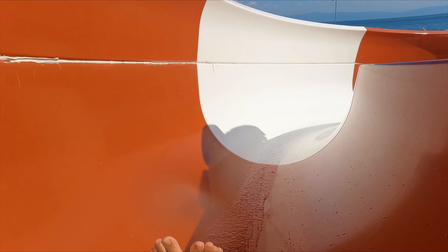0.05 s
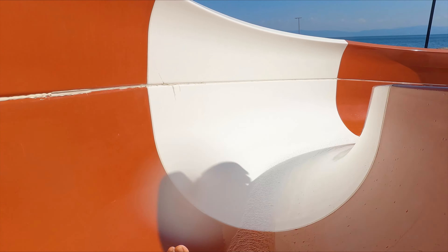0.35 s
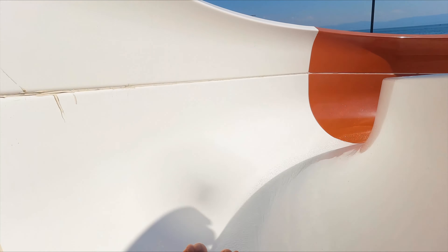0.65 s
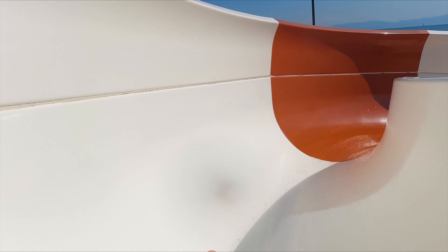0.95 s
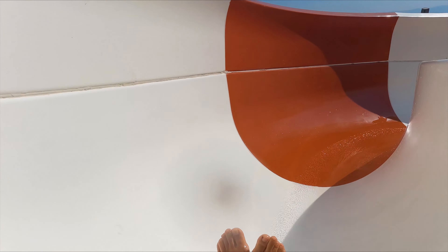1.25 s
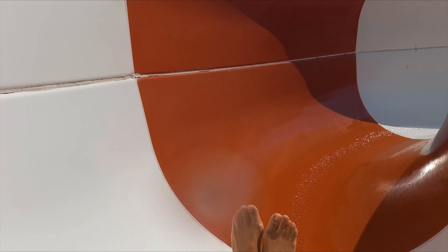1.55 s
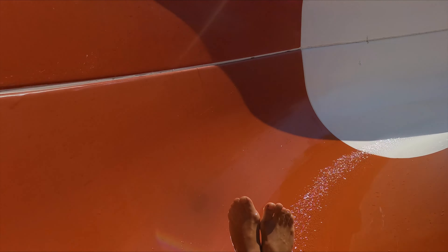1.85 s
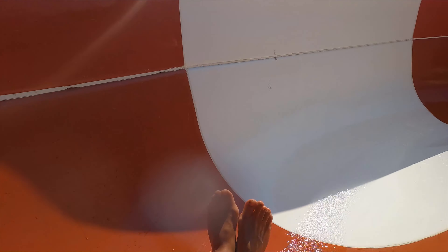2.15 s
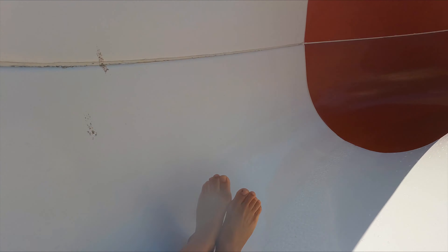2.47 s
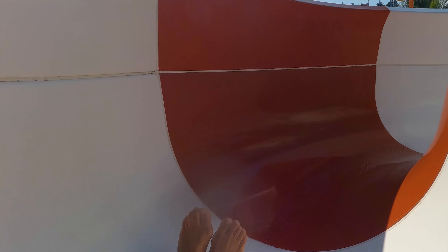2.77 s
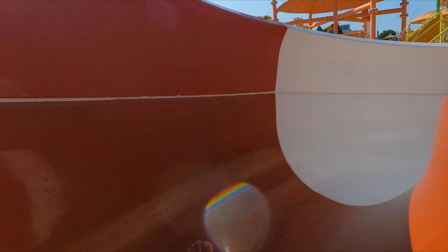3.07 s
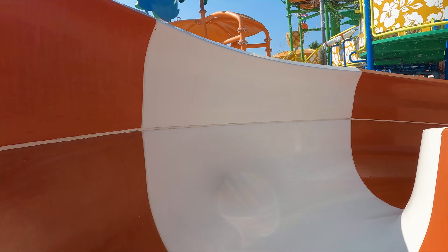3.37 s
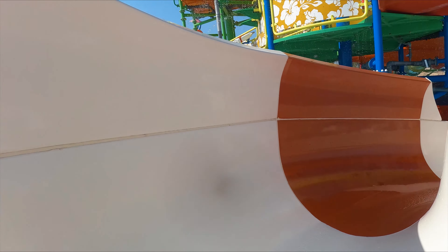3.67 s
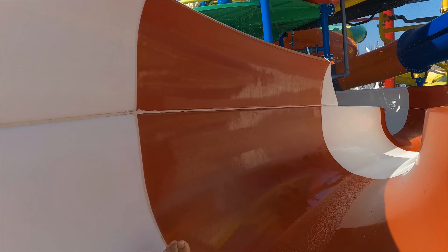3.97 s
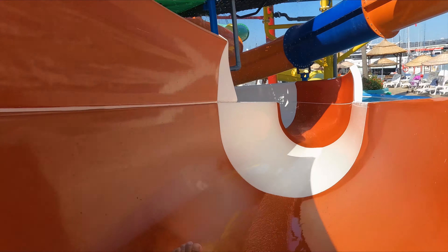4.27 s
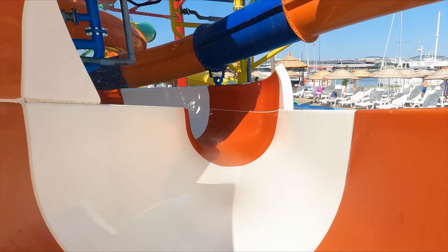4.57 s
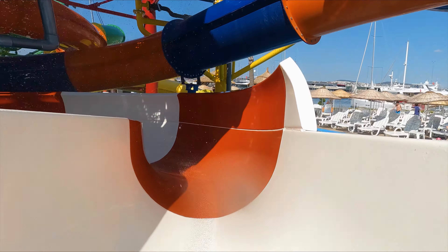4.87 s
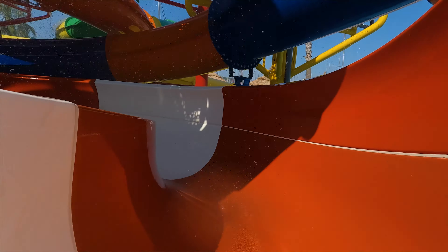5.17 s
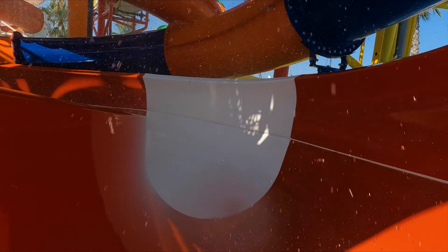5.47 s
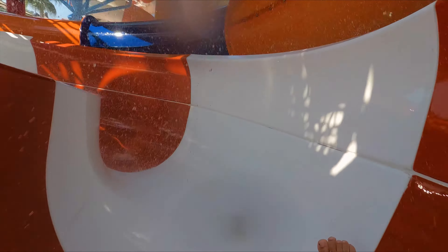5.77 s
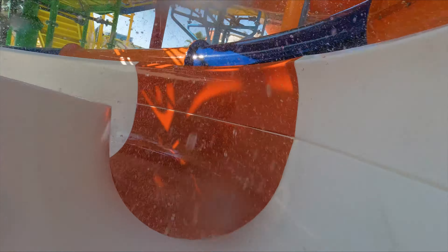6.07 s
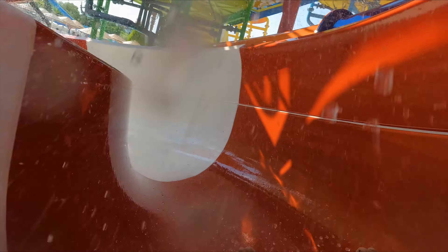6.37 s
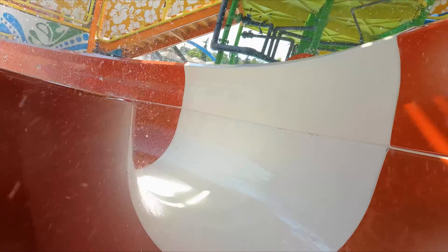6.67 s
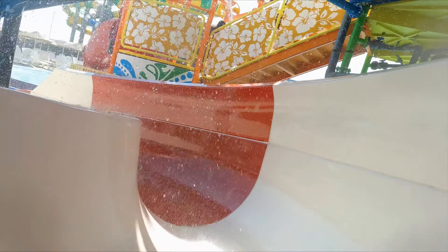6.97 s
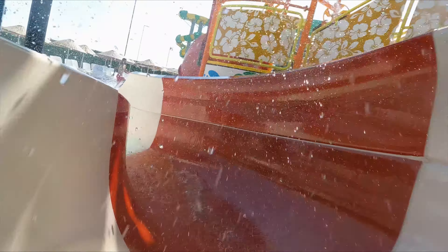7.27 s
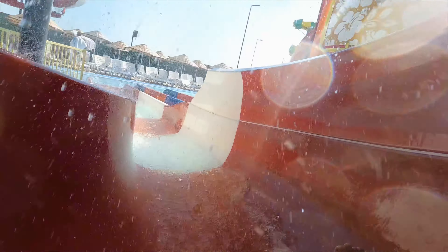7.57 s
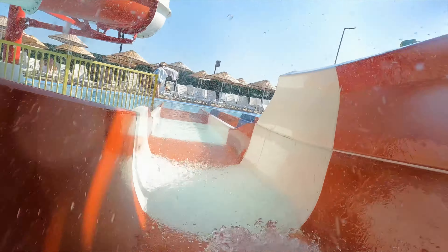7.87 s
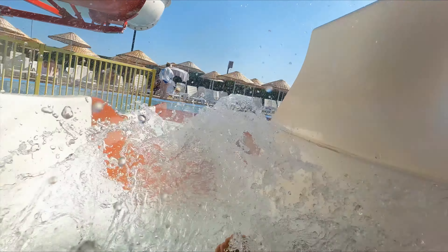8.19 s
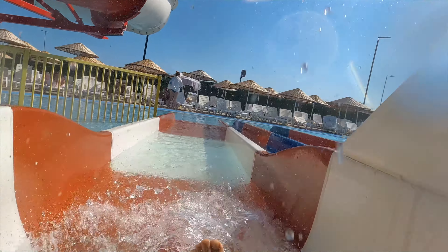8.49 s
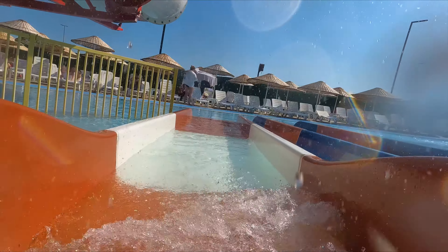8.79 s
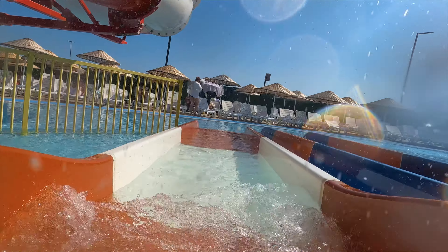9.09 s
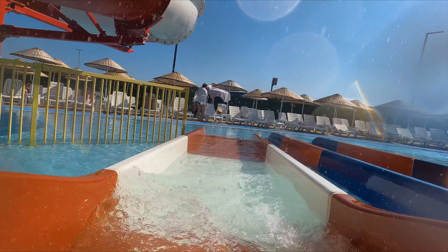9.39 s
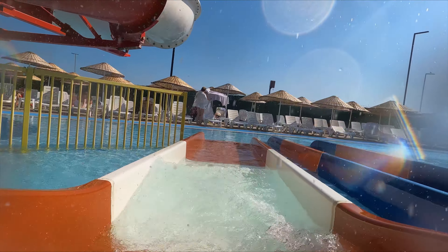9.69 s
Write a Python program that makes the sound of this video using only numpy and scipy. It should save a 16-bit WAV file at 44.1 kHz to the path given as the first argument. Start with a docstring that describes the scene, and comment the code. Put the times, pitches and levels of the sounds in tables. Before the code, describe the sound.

From the start, a film of water hisses steadily, very close to a waterproof camera riding down a fibreglass water slide. Low wind buffeting and the flume's rumble run underneath. During the first two seconds the shell hums briefly several times, and soft, dull thumps follow at about 2.3, 2.8 and 3.7 seconds. From 5.5 to 7 seconds the hiss wavers in pitch and sputters, the wind peaks, and spray and large drops tick on the case. At around 6.5 seconds water floods the microphone, and the hiss sinks and dulls over the next second. Muffled churning takes over, with bubble gulps, scattered taps, a brief faint fizz near 7.3 and a thump near 8. A hollow, muffled water roar swells from about 8.3 to 9 seconds, then eases into low churning and gurgling until the end, just before 10 seconds.

```python
"""Inside a fibreglass water slide, riding down with a waterproof camera in hand.
Right at the microphone, the water film hisses through the resonances of the wet port. Spray ticks on
the case, wind buffets the port, and the flume drums and hums under the rider.
Then water floods the port: the hiss sinks away and the run-out lane churns and gulps, muffled."""
import sys
import numpy as np
from scipy import signal
from scipy.fft import rfft, irfft, next_fast_len
from scipy.io import wavfile
from scipy.ndimage import map_coordinates

SR = 44100
rng = np.random.default_rng(int(sys.argv[2]) if len(sys.argv) > 2 else 0)


def waveform_to_disk(signal):
    """Save audio, clipped to [-1, 1], as 16-bit WAV at the path in sys.argv[1]."""
    frames = np.transpose(np.atleast_2d(signal))
    scaled = np.clip(frames, -1, 1) * 32767
    samples = np.round(scaled).astype(np.int16)
    wavfile.write(sys.argv[1], SR, samples)


N = 429534
TIME = np.arange(N) / SR

# water film just under the rider: (time [s], relative level [dB])
HISS_LEVEL = [(0, -29.5), (.6, -32), (2.6, -29), (4, -30.5), (5.05, -28.5), (5.45, -25.5), (6.19, -27.5),
              (6.3, -34.5)]
# the hiss before it enters the microphone port: (frequency [Hz], relative density [dB])
FILM_SPECTRUM = [(200, -12), (450, -19.5), (650, -1.5), (1200, -3.5), (1900, -2), (4000, -8), (5000, -24),
                 (6500, -33.5), (8000, -40), (10000, -54.5), (13000, -83)]
# peaks and notches of the wet port: (frequency [Hz], width [Hz], gain [dB], share of a surge [ratio])
PORT_RESONANCES = [(1903, 273, 10, 0.21), (2174, 288, -12, 0.7), (2497, 295, 10.5, 1),
                   (2896, 110, -12.5, 0.71), (3437, 236, -21.5, 0.73), (3936, 274, 8.5, 1.0),
                   (5600, 280, 4.5, 1.0), (6470, 400, 6.5, .6), (7180, 430, -6.5, 0.62),
                   (7450, 540, 5.5, 0.98), (9800, 700, 4, .8)]
# surges of water shift those resonances: (crest time [s], rise in pitch [fraction], half-width [s])
PORT_SURGES = [(.27, 0.011, .055), (.5, -0.031, 0.12), (4.35, 0.035, 0.08), (4.62, -0.027, 0.046),
               (4.77, 0.055, 0.026), (5.655, .048, 0.03), (5.771, 0.071, 0.022), (5.856, 0.13, 0.024),
               (5.932, .15, 0.026), (6.12, -0.052, .075), (6.238, -0.011, .016), (6.333, 0.26, .023),
               (6.411, .22, 0.028), (6.487, 0.15, .027), (6.567, .125, 0.015), (6.627, .15, .03),
               (6.895, .11, 0.026), (7.16, 0.013, .025)]
# drops landing right on the port: (time [s], level against the hiss [dB])
PORT_CRACKLE = [(5, -19), (5.8, -7.5), (6.5, -5)]

# deep water around the case: (time [s], churn level before the water's depth scales it [dB])
CHURN_LEVEL = [(6.3, -6.5), (6.91, -28), (7.25, -22.5), (8.74, -20.5), (9.27, -22), (9.7, -20.5)]
# foam comes up as the port floods: (time [s], foam level [dB], churn pitch [ratio])
FLOODING = [(5.2, -85, 0.9), (6.35, -54, 1.33), (6.85, -56, 0.82), (7.25, -52.5, 0.89), (7.7, -49.5, 0.9),
            (8, -48, 1.106), (8.65, -43, 1.03), (9.1, -47, 1.043), (9.74, -47, 1.067)]
# churn and foam in the run-out lane: (frequency [Hz], relative density [dB])
CHURN_SPECTRUM = [(150, -23), (280, -2), (420, -2.5), (600, -4), (850, -9.5), (1100, -17.5), (1450, -29.5),
                  (2200, -51.5), (4000, -76)]
FOAM_SPECTRUM = [(600, -7), (1400, 2.5), (2000, -2.5), (2800, -9.5), (4000, -20.5), (5500, -27),
                 (7500, -38), (10000, -64)]
# the body ploughs a hollow into the lane: (time [s], level [dB])
HOLLOW_LEVEL = [(7.8, -59), (8.2, -35), (8.45, -23.5), (8.8, -23.5), (8.95, -28.5), (9.3, -34.5),
                (9.74, -36)]
# the hollow's resonances: (frequency [Hz], width [Hz], relative level [dB])
HOLLOW_MODES = [(450, 79, 1), (573, 310, -5.5)]
# single big bubbles: (time [s], peak [dB], pitch [Hz], glide [octaves/s], t60 [s])
BIG_BUBBLES = [(1.194, -19.5, 1850, -2, 0.06), (6.562, -16, 735, -27.5, 0.064),
               (7.0, -14.5, 450, -7.5, 0.059), (7.235, -23, 782, -1, 0.19), (7.475, -13.5, 450, -1, 0.08),
               (7.659, -7, 206, -26, 0.036), (8.895, -21, 745, -1, 0.76), (9.167, -28, 1440, -2, 0.38),
               (9.401, -14, 403, -5, 0.14)]

# large drops on the case, lower and deader once the port is full:
# (time [s], ring peak [dB], ring pitch [Hz], ring t60 [s], crack peak [dB], crack pitch [Hz])
LARGE_DROPS = [(5.652, -11.5, 1960, 0.017, -18, 4000), (5.971, -11, 1950, 0.005, -9, 4050),
               (6.081, -13.5, 1850, 0.028, -40, 4000), (6.162, -12, 1750, 0.011, -36, 6800),
               (6.214, -9.5, 1890, 0.03, -31, 4100), (6.307, -12.5, 2080, 0.013, -16.5, 4830),
               (6.322, -16, 2000, 0.02, -38, 4200), (6.369, -17, 2030, .012, -18, 5200),
               (6.43, -25, 1990, .012, -20, 3100), (6.498, -13, 1957, 0.03, -36, 4300),
               (6.571, -20, 1830, .015, -32, 2900), (6.581, -19, 1040, 0.0088, -30, 4100),
               (6.673, -24, 1970, 0.021, -31, 4200), (6.7252, -19.5, 1910, 0.012, -33, 4370),
               (7.3473, -25.5, 1480, .008, -34, 2800), (7.3735, -21.5, 1260, 0.0077, -36, 2805),
               (7.425, -18, 1780, .005, -22, 3000), (7.435, -21, 1400, 0.015, -52, 2800),
               (7.478, -28, 1250, .008, -31, 2700), (7.498, -20, 1150, 0.0054, -36, 3300),
               (7.67, -18.5, 1210, 0.04, -46, 2600), (7.756, -19.5, 1199, 0.0047, -35, 3080),
               (7.884, -20, 1120, 0.01, -49, 2800), (7.9252, -24, 1350, 0.0068, -32, 3600),
               (7.977, -18, 1090, 0.011, -32, 2600), (8.495, -23, 1200, .008, -31, 2900),
               (8.845, -20, 1130, .006, -35, 4300), (8.987, -17, 1177, 0.0056, -35.5, 4908),
               (9.181, -14.5, 1350, .004, -15.5, 4920)]
# a drop's ring: (multiple of ring pitch [ratio], relative level [dB])
RING_MODES = [(0.679, -9.5), (.86, 4.5), (1, 17.5), (1.25, -7)]
# a drop's crack: (multiple of crack pitch [ratio], width [Hz], relative level [dB])
CRACK_MODES = [(.62, 996, -1), (0.999, 550, 3)]
# fine spray on the case: (time [s], rate [drops/s], relative level [dB])
FINE_SPRAY = [(5.6, 20, -46), (6.05, 140, -28), (6.55, 170, -31.5), (6.85, 130, -39), (7.2, 70, -52),
              (7.4, 65, -47.5)]
# what the spray rings with: (frequency [Hz], width [Hz], relative level [dB])
PATTER_MODES = [(1850, 450, 0.5), (3200, 1800, -5.5)]
# a thin jet across the case: (frequency [Hz], relative density [dB])
JET_SPECTRUM = [(1500, -21), (2400, -11), (2720, 11.5), (3100, -20), (4500, -10), (5700, -7), (6600, -27),
                (13000, -39)]
# small droplets, and the bright crack of two large drops: (time [s], peak [dB], pitch [Hz])
SHORT_TICKS = [(6.218, -22, 4100), (6.227, -39, 6000), (6.545, -39, 5200), (6.829, -45, 5600),
               (6.95, -43, 4582), (7.233, -45, 2596), (7.507, -40, 3800), (7.8434, -46, 4800),
               (7.94, -37, 3300), (8.032, -42, 2805), (8.159, -47, 5900), (8.447, -41, 3800),
               (8.462, -43, 2900), (8.651, -47, 5400), (8.744, -46, 5396), (8.759, -41, 2600),
               (8.849, -38, 3620), (8.876, -52, 4390), (9.102, -41, 2802), (9.1826, -42, 6800),
               (9.287, -41, 3300), (9.555, -45, 4096)]
# the steady water and wind sound dips briefly after a few of the drops: (time [s], depth [dB])
LEVEL_DIPS = [(5.974, 6), (6.586, 1.5), (8.853, 2.5), (8.995, 1.5), (9.187, 5.5)]

# wind on the port, sheltered once water covers it: (time [s], level [dB])
WIND_LEVEL = [(.48, -22), (.7, -28), (.83, -18.5), (5.55, -18), (5.97, -13), (6.9, -27.5), (7.15, -28),
              (9.7, -27)]
# wind buffeting and the flume's rumble: (frequency [Hz], relative density [dB])
WIND_SPECTRUM = [(4, 4.5), (17, 19), (35, 15.5), (48, -12), (90, -33.5), (200, -82.5)]
RUMBLE_SPECTRUM = [(30, -7.5), (55, 4), (80, 2.5), (130, -1), (210, -3.5), (310, -13.5), (430, -9.5),
                   (560, -22.5), (800, -14.5), (1200, -36.5), (2500, -89)]
# modes of the fibreglass shell: (frequency [Hz], width [Hz], relative level [dB])
SHELL_MODES = [(97.7, 8.2, -4), (185, 27, -1), (447, 15, -6.5), (562, 14, -14.5)]
# the body presses into the wall of a bend: (start [s], length [s], pitch [Hz], level [dB])
WALL_PRESSES = [(-.04, 0.56, 91.9, -24.5), (-.04, 0.27, 173.6, -26.5), (0.135, 0.34, 453.4, -38.5),
                (0.868, 0.18, 96.1, -23), (0.927, 0.23, 447, -29), (1.142, 0.54, 91.7, -25.5),
                (1.593, 0.25, 450, -31), (1.96, 0.28, 450, -33)]
# dull blows on the shell and the case: (time [s], peak [dB], pitch [Hz], t60 [s])
BLOWS = [(2.334, -18, 99, 0.11), (2.781, -19.5, 168, 0.067), (3.746, -17.5, 76, 0.22),
         (6.216, -17.5, 152, 0.059), (6.625, -13, 73.6, 0.26), (7.964, -10.5, 198, 0.056),
         (9.1812, -12, 346, 0.011)]

# once the port floods, the hiss sinks at a steady rate and its treble faster still
FLOOD_S, SINK_DB_PER_S, DULL_DB_PER_KHZ_S = 6.416, 26, 1


def film_hiss(droplets_per_s=9000, crackles_per_s=110, flutter_db=0.47, tremble=0.1, waver=0.009):
    """Countless droplets thrown from the film, heard close up through the wavering port."""
    droplets = rms_one(grains(droplets_per_s, spread_db=2.5)) + 0.8 * rng.standard_normal(N)
    crackle = from_db(in_time(PORT_CRACKLE)[0]) * rms_one(grains(crackles_per_s, spread_db=2.5))
    # the further the water is pushed, the more it trembles
    push = sum(height * swell(s, width_s) for s, height, width_s in PORT_SURGES)
    rise = push * (1 + tremble * drift(70)) + waver * drift(2.6)
    flooded_db = -SINK_DB_PER_S * np.maximum(TIME - FLOOD_S, 0)
    level_db = in_time(HISS_LEVEL)[0] + 0.8 + flooded_db + flutter_db * drift(30)
    # a push also swells the hiss a little and makes it sputter
    surge_db = np.clip(push, 0, .05) * (14 + 35 * drift(160))
    return from_db(level_db + surge_db) * wet_port(droplets + crackle, rise)


def wet_port(x, rise, film_share=0.65, deepen=0.72):
    """Water on the microphone port shifts each peak and notch, and deepens them as it pushes."""
    window = dict(fs=SR, nperseg=512, noverlap=384)
    f, t, frames = signal.stft(x, **window)
    f, rise = f[:, None], np.interp(t, TIME, rise)
    dull_db = DULL_DB_PER_KHZ_S * (f / 1000) * np.maximum(t - FLOOD_S, 0)
    gain_db = at_hz(FILM_SPECTRUM, f / (1 + film_share * rise)) - dull_db
    for hz, width, db, share in PORT_RESONANCES:
        detuning = 2 * (f / (1 + share * rise) - hz) / width
        gain_db += db * (1 + deepen * rise) / (1 + detuning ** 2)
    _, heard = signal.istft(frames * from_db(gain_db), **window)
    return rms_one(heard[:N])


def run_out(bubbles_per_s=300, bubble_q=19):
    """Large bubbles ring all round the case, a hollow roars behind the body, foam hisses faintly."""
    foam_db, pitch_ratio = in_time(FLOODING)
    births = grains(bubbles_per_s, spread_db=1.5)
    pitches_hz = np.geomspace(250, 1500, 24)
    pitch_index = rng.integers(0, len(pitches_hz), N)
    bubbles = sum(resonate(births * (pitch_index == k), hz, hz / bubble_q)
                  for k, hz in enumerate(pitches_hz))
    water = rms_one(colour(bubbles, CHURN_SPECTRUM) + 0.67 * noise(CHURN_SPECTRUM))
    # the water deepens as the flume levels out
    deepening_db = np.interp(TIME, [4.5, 5.5, 6.3, 6.9], [-46, -21, -21.5, -3])
    churn = from_db(in_time(CHURN_LEVEL)[0] + deepening_db) * muffle(glide(water, pitch_ratio), 2200)
    hollow = from_db(in_time(HOLLOW_LEVEL)[0]) * muffle(noisy_modes(HOLLOW_MODES), 870)
    foam = from_db(foam_db + 1.8 * drift(30)) * noise(FOAM_SPECTRUM)
    return churn + hollow + foam


def gulps(swell_s=0.0035, shake_hz=60):
    """Big bubbles swell, ring and glide, shaken by the turbulence around them."""
    out = np.zeros(N)
    t = np.arange(SR // 4) / SR
    attack = (1 - np.exp(-t / swell_s)) ** 2
    for s, db, hz, octaves_per_s, t60 in BIG_BUBBLES:
        pitch_hz = hz * 2 ** (octaves_per_s * t) + shake_hz * drift(110)[:len(t)]
        decay_db = -60 * t / t60 + 3 * drift(130)[:len(t)]
        add(out, s, db, tone(pitch_hz) * attack * from_db(decay_db))
    return out


def drops(splat_s=0.0019, crack_s=0.001, sharpness=0.47):
    """Each large drop splats on the case, cracks and rings briefly in the water on the port."""
    out = np.zeros(N)
    for s, ring_db, hz, t60, crack_db, crack_hz in LARGE_DROPS:
        width = np.log(1000) / (np.pi * t60)
        slap, snap = splat(splat_s, sharpness), splat(crack_s, sharpness)
        ring = sum(from_db(db) * rms_one(resonate(slap, hz * k, width * k)) for k, db in RING_MODES)
        crack = sum(from_db(db) * rms_one(resonate(snap, crack_hz * k, w)) for k, w, db in CRACK_MODES)
        add(out, s, ring_db, muffle(ring, 1.29 * hz))
        add(out, s, crack_db, muffle(crack, 1.02 * crack_hz))
    return out


def spray():
    """Small drops patter on the case, right beside the microphone."""
    per_s, level_db = in_time(FINE_SPRAY)
    patter = np.zeros(N)
    for hz, width, db in PATTER_MODES:
        hits = grains(per_s / len(PATTER_MODES), spread_db=2)
        patter += from_db(db) * SR / (2 * np.pi * width) * resonate(hits, hz, width)
    return muffle(from_db(level_db) * patter, 6500, order=6)


def jet(start_s=7.28, attack_s=0.025, hold_s=0.19, release_s=0.029, level_db=-48.5, sputter_db=4.5):
    """A thin jet of water fizzes and sputters across the case."""
    age = TIME - start_s
    envelope = np.clip(age / attack_s, 0, 1) * np.exp(-np.maximum(age - hold_s, 0) / release_s)
    return from_db(level_db + sputter_db * drift(60)) * envelope * noise(JET_SPECTRUM)


def ticks(decay_s=0.00092, width_hz=1900):
    """Short ticks on the case: small droplets, and the bright crack of two large drops."""
    out = np.zeros(N)
    for s, db, hz in SHORT_TICKS:
        tick = resonate(splat(decay_s, sharpness=0.56), hz, width_hz)
        add(out, s, db, muffle(tick, 1.23 * hz))
    return out


def wind(gust_db=2.5):
    """Rushing air buffets the microphone port."""
    return from_db(in_time(WIND_LEVEL)[0] + gust_db * drift(4)) * noise(WIND_SPECTRUM)


def flume(rub_db=-29, rub_fade_db_per_s=0.68):
    """The shell rumbles and rings underneath as the rider rubs it, ever more lightly."""
    # the rumble grows as water closes around the case
    rumble_db = np.interp(TIME, [7.03, 7.05], [-25.5, -20.5])
    rumble = from_db(rumble_db) * noise(RUMBLE_SPECTRUM)
    shell = from_db(rub_db - rub_fade_db_per_s * TIME) * noisy_modes(SHELL_MODES)
    return rumble + muffle(shell, 700, order=2)


def wall_hums(edge_s=0.099, waver_hz=3.3, flutter_db=2.5):
    """In a bend the friction locks onto one mode of the shell, which swells, sings and fades."""
    out = np.zeros(N)
    for s, length_s, hz, db in WALL_PRESSES:
        press = np.clip(np.minimum(TIME - s, s + length_s - TIME) / edge_s, 0, 1)
        hum = np.sqrt(2) * tone(hz + waver_hz * drift(8.7))
        out += from_db(db + flutter_db * drift(4.1)) * press * hum
    return out


def thumps(swell_cycles=0.48):
    """Dull blows reach the case as a few low cycles."""
    out = np.zeros(N)
    t = np.arange(SR // 3) / SR
    for s, db, hz, t60 in BLOWS:
        envelope = (1 - np.exp(-t * hz / swell_cycles)) * from_db(-60 * t / t60)
        add(out, s, db, np.sin(2 * np.pi * hz * t) * envelope)
    return out


def dips(fall_s=0.003, hold_s=0.043, release_s=0.041):
    """A gain that falls quickly at each listed dip, holds and swells back."""
    corners_s = np.cumsum([0, fall_s, hold_s, release_s])
    return from_db(-sum(db * np.interp(TIME - s, corners_s, [0, 1, 1, 0]) for s, db in LEVEL_DIPS))


def splat(decay_s, sharpness):
    """An impact: one sharp touch, then scatter that dies away."""
    t = np.arange(SR // 8) / SR
    scatter = rng.standard_normal(len(t)) * np.exp(-t / decay_s)
    return scatter / np.linalg.norm(scatter) + sharpness * (t == 0)


def grains(per_s, spread_db):
    """Random impacts, many small and few large."""
    strength = from_db(spread_db * np.minimum(rng.exponential(1, N), 4))
    return strength * rng.choice([-1, 1], N) * (rng.random(N) < per_s / SR)


def noisy_modes(modes):
    """Modes kept ringing by a random force."""
    return sum(from_db(db) * rms_one(resonate(rng.standard_normal(N), hz, width))
               for hz, width, db in modes)


def resonate(x, hz, width):
    """Two-pole resonance with gain 1 at its peak."""
    r = np.exp(-np.pi * width / SR)
    feedback = [1, -2 * r * np.cos(2 * np.pi * hz / SR), r * r]
    return signal.lfilter(np.array([1, 0, -1]) * (1 - r * r) / 2, feedback, x + 1e-18)


def muffle(x, hz, order=4):
    """Low-pass of the sealed case."""
    return signal.sosfilt(signal.butter(order, hz, fs=SR, output="sos"), x)


def tone(hz):
    """A sine that follows a changing pitch."""
    return np.sin(2 * np.pi * np.cumsum(hz) / SR)


def noise(spectrum):
    """Steady coloured noise; rms 1."""
    return colour(rng.standard_normal(N), spectrum)


def colour(x, spectrum):
    """Shape a sound by a smooth spectrum; rms 1."""
    size = next_fast_len(len(x))
    f = np.arange(size // 2 + 1) * SR / size
    return rms_one(irfft(rfft(x, size) * from_db(at_hz(spectrum, f)), size)[:len(x)])


def glide(x, ratio):
    """Move every frequency of a sound by a changing ratio."""
    return map_coordinates(x, [np.cumsum(ratio)], order=3, mode="mirror")


def drift(rate_hz):
    """A smooth random wander; rms 1."""
    step, settle = 40, 2000  # samples per step, steps for the filter to settle
    r = np.exp(-2 * np.pi * rate_hz * step / SR)
    kicks = rng.standard_normal(N // step + settle + 2)
    slow = signal.lfilter([1], [1, -2 * r, r * r], kicks)[settle:]
    return np.interp(np.arange(N) / step, np.arange(len(slow)), rms_one(slow))


def swell(s, width_s):
    """A smooth rise and fall of height 1 around a moment."""
    return np.exp(-np.minimum(((TIME - s) / width_s) ** 2, 50))


def add(out, s, db, sound):
    """Place a sound at a time with a peak level."""
    at = int(s * SR)
    out[at:at + len(sound)] += from_db(db) * sound[:N - at] / np.abs(sound).max()


def in_time(rows):
    """Each column of a curve, sample by sample."""
    s, *columns = np.transpose(rows)
    return [np.interp(TIME, s, c) for c in columns]


def at_hz(spectrum, hz):
    """Read a spectrum on a log-frequency axis."""
    points_hz, db = np.transpose(spectrum)
    return np.interp(np.log(np.maximum(hz, 1)), np.log(points_hz), db)


def from_db(db):
    """Decibels to gain."""
    return 10 ** (np.asarray(db) / 20)


def rms_one(x):
    """Scale to unit rms."""
    return x / np.sqrt(np.mean(x ** 2) + 1e-20)


def scene():
    """Water, wind and flume at one hand-held microphone; only the sustained sounds dip."""
    sustained = film_hiss() + wind() + flume() + wall_hums() + run_out() + spray() + jet()
    return (sustained * dips() + drops() + ticks() + gulps() + thumps())[None]


def record(dry):
    """The camera's mono track: a 4 ms fade-in, and nothing above 15 kHz."""
    fade_in = np.minimum(TIME / .004, 1)
    return signal.sosfilt(signal.cheby2(12, 70, 15000, fs=SR, output="sos"), fade_in * dry)


dry = scene()
out = record(dry)
waveform_to_disk(out)
```